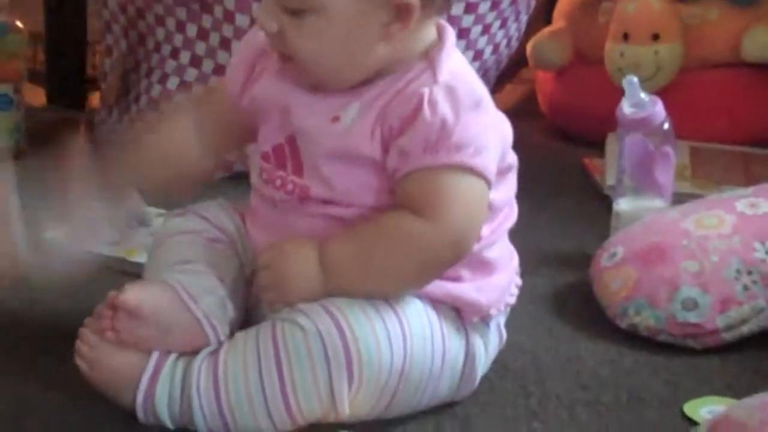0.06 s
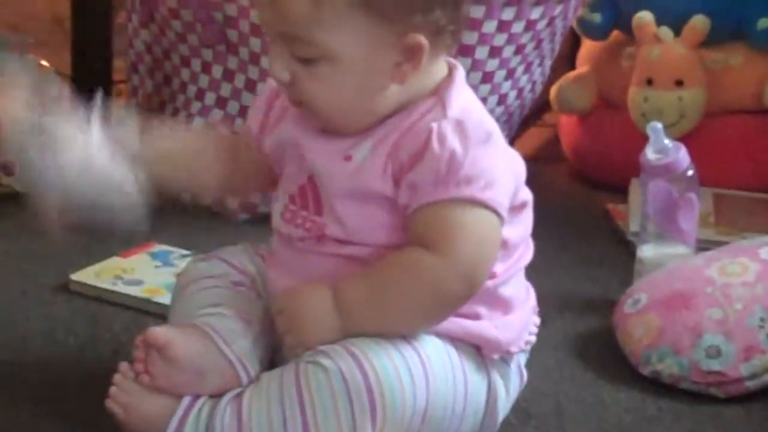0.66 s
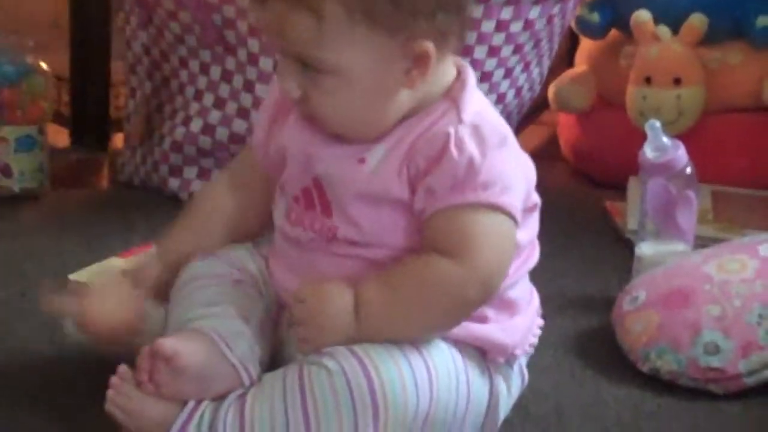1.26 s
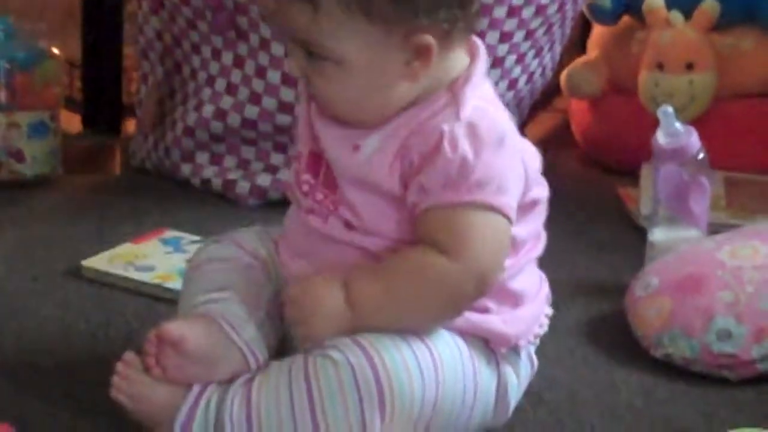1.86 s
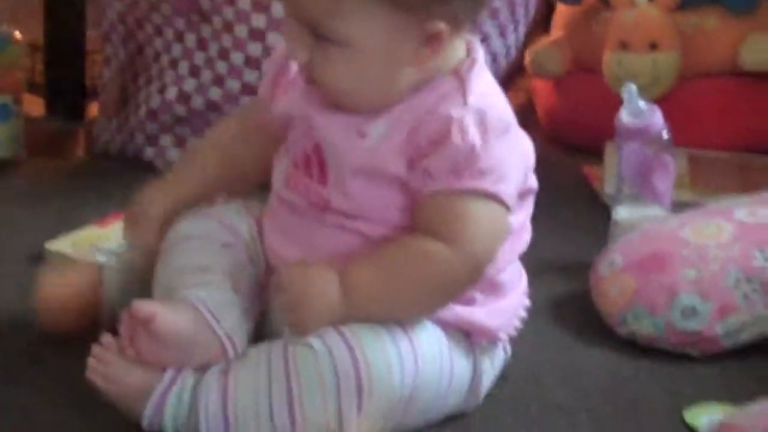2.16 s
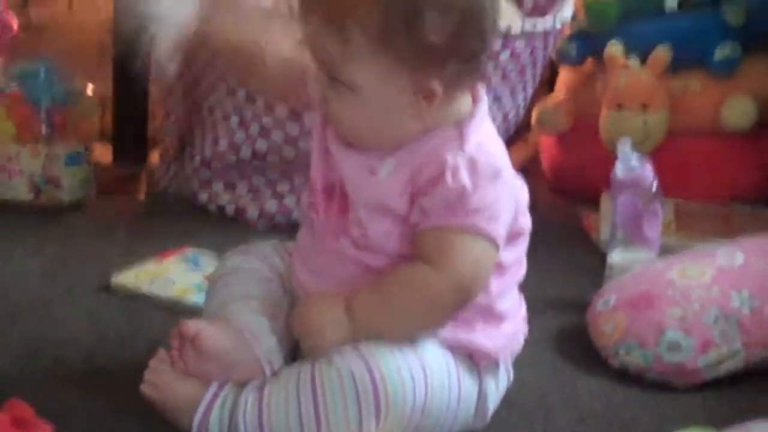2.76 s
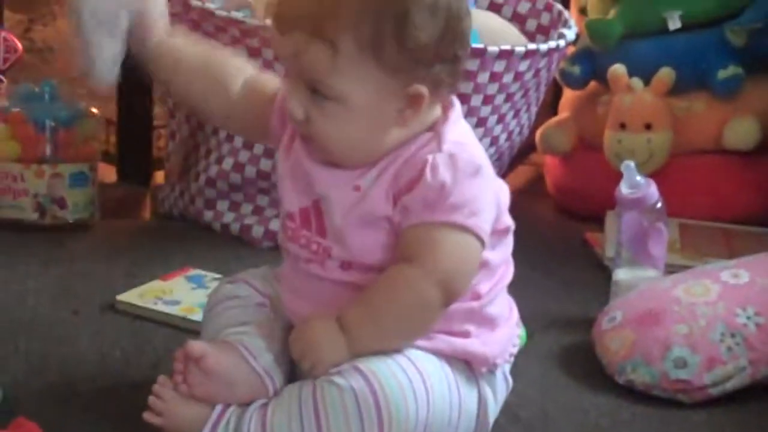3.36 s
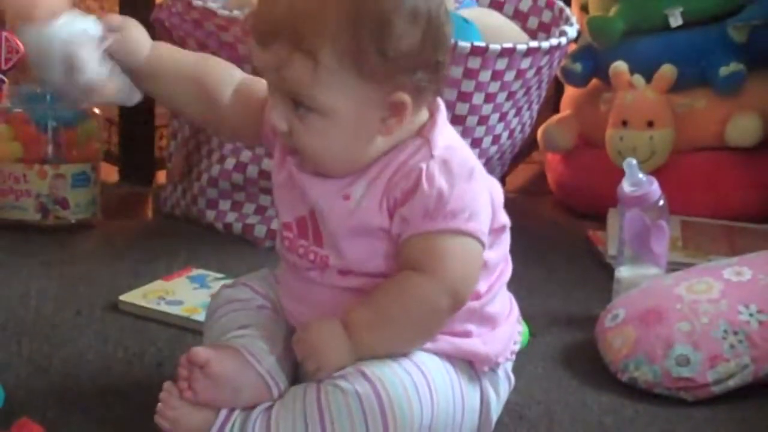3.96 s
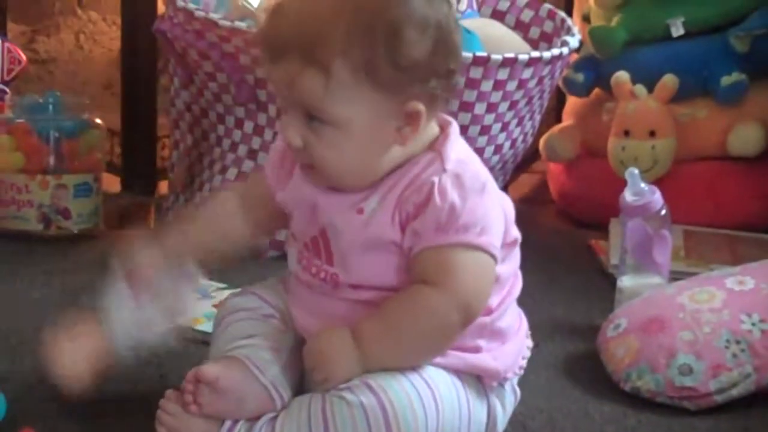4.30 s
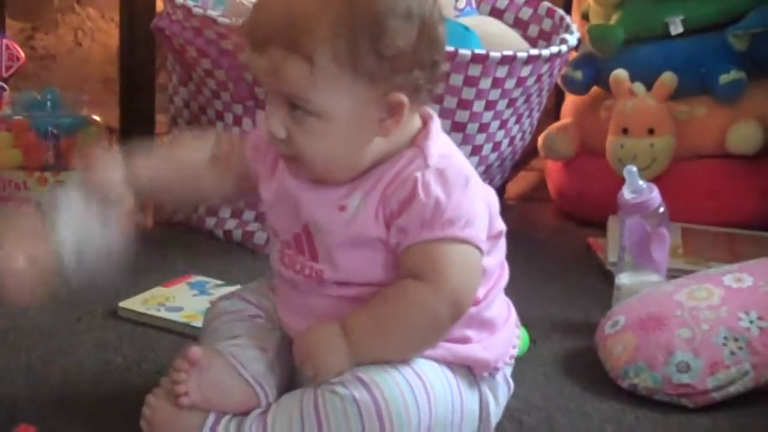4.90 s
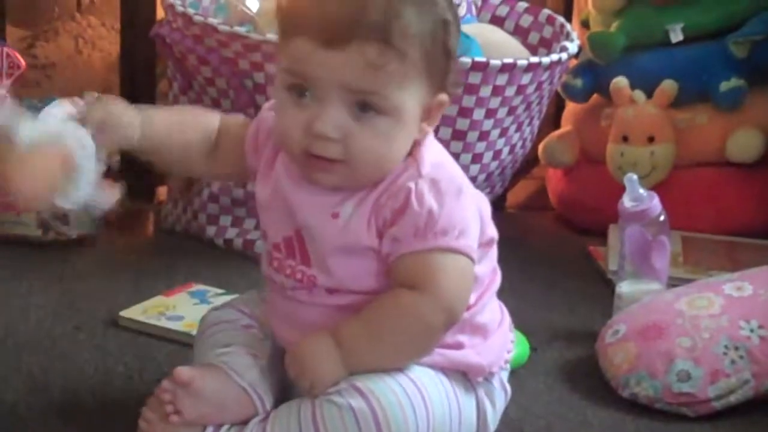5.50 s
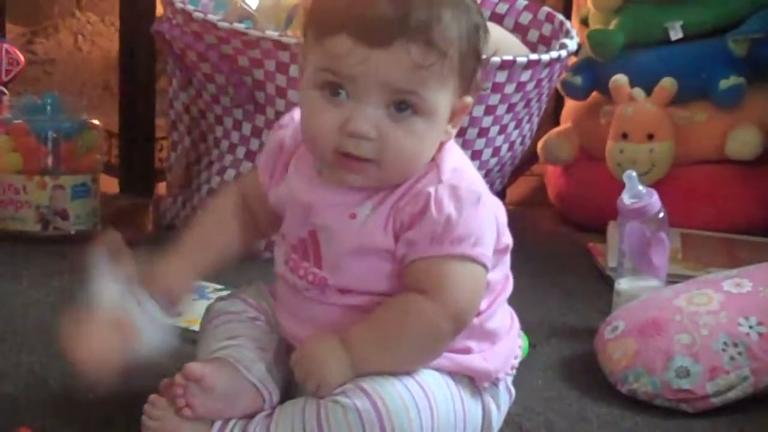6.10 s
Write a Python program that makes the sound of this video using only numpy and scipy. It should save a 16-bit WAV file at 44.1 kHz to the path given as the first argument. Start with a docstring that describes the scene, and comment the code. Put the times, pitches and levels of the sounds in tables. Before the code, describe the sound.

A doll's hard, hollow head is banged on a carpeted floor nine times at an uneven pace, quickening in the second half. Each blow is a short, dull knock with a crunch of carpet and a brief boom from the small living room. Soft flops, a few plastic clacks and a faint rustle of the doll's clothes come in between. The microphones add a light, steady hiss.

```python
"""In a small living room a baby bangs a doll's hard, hollow head on the carpeted floor nine times.
Each blow is a short dull knock with a crunch of carpet pile; nearby walls reflect it and the room's
standing waves boom briefly. Now and then the doll flops down again or clacks, and its clothes rustle
as it swings. A few faint, dry ticks sound close to the two small microphones, which add hiss and a
treble ring; a faint hum lies below."""
import sys
import numpy as np
from scipy import signal
from scipy.io import wavfile

SR = 44100
rng = np.random.default_rng(int(sys.argv[2]) if len(sys.argv) > 2 else 0)


def master_out(mix):
    """Clip the mix to full scale and print it as 16-bit PCM to the path in sys.argv[1]."""
    frames = np.transpose(np.atleast_2d(mix))
    ceiling = np.clip(frames, -1, 1)
    pcm = np.round(ceiling * 32767).astype(np.int16)
    wavfile.write(sys.argv[1], SR, pcm)


N = 270950

# landings of the head on the carpet:
# (time [s], strength [dB], boom [dB], shell resonance at the landing spot [Hz], its lift [dB])
BLOWS = [(0.1989, -2, -1, 1080, -8), (0.345, -26, 7.5, 750, 5.5), (1.279, -24, -12, 750, 13),
         (1.29, -2.5, -3.5, 1360, 6), (1.470, -27, 2.5, 920, 10), (2.1825, -3, 2, 790, 3),
         (3.0077, -3.5, -2.5, 617, -11), (3.6491, -1.5, 0.5, 1480, -5), (3.7481, -21.5, -4, 790, -17),
         (4.2976, -1, 0.5, 1750, 2), (4.824, 4.5, -7.5, 480, 0), (4.978, -28.5, 9.5, 393, 15.5),
         (5.2641, 0, -4, 730, 5), (5.8007, -2, -3, 1450, 3.5)]
RING = SR * 2 // 5  # samples in which one impact dies away
AGE = np.arange(RING) / SR  # seconds since an impact
TOP_HZ = 13900  # upper edge of hiss and crunch


def from_db(db):
    """Amplitude ratio: tenfold for every 20 dB."""
    return 10 ** (np.asarray(db) / 20)


def fade(t60):
    """Exponential decay by 60 dB in t60 seconds."""
    return np.exp(-np.log(1000) * AGE / t60)


def cut(x, hz, kind="low", order=2):
    """Butterworth filter: a maximally flat passband."""
    sections = signal.butter(order, np.minimum(hz, SR / 2 - 1), kind, fs=SR, output="sos")
    return signal.sosfilt(sections, x)


def resonate(x, hz, width_hz):
    """Second-order resonance with unit gain at its peak."""
    radius = np.exp(-np.pi * width_hz / SR)
    feedback = [1, -2 * radius * np.cos(2 * np.pi * hz / SR), radius ** 2]
    return signal.lfilter(np.array([1, 0, -1]) * (1 - radius ** 2) / 2, feedback, x + 1e-18)


def add(track, start_s, sound):
    """Superposition: a sound sums into the track from start_s on."""
    start = max(round(start_s * SR), 0)
    part = sound[..., :track.shape[-1] - start]
    track[..., start:start + part.shape[-1]] += part


def pan(sound, db):
    """Level difference as a cue to direction: left exceeds right by db."""
    return sound * from_db([[db / 2], [-db / 2]])


def modes(table, sign=1, spread_db=0):
    """Free vibration: damped modes, unevenly excited; a negative sign starts neighbours in antiphase."""
    return sum(sign ** k * from_db(db + spread_db * rng.standard_normal())
               * fade(t60) * np.cos(2 * np.pi * hz * AGE)
               for k, (hz, db, t60) in enumerate(table))


def burst(t60):
    """Many tiny random contacts sum to decaying noise, here of unit energy."""
    spray = rng.standard_normal(RING) * fade(t60)
    return spray / np.linalg.norm(spray)


def noise_bands(table, size):
    """Partially coherent stereo noise: yields each half-octave band with the table's extra columns."""
    hz, *columns = np.transpose(table)
    edges_hz = np.geomspace(20, 18000, 21)
    run_in = SR // 10  # samples for the filters to settle
    white = rng.standard_normal((2, 2, size + run_in))
    for k, (low, high) in enumerate(zip(edges_hz, edges_hz[1:])):
        log_centre = np.log(low * high) / 2
        db, *extras, coherence = [np.interp(log_centre, np.log(hz), column) for column in columns]
        mid, side = cut(white[k % 2], [low, high], "band")[:, run_in:]
        in_phase = np.sqrt((1 + coherence) / 2) * mid
        antiphase = np.sqrt((1 - coherence) / 2) * side * [[1], [-1]]
        yield from_db(db) * (in_phase + antiphase), extras


def background(hiss_db=-59):
    """Stationary noise floor: broadband microphone hiss and a faint tonal hum."""
    # hiss spectrum: (frequency [Hz], relative spectral density [dB], left-right coherence [0-1])
    spectrum = [(25, 11, 0.31), (60, 5.5, 0.18), (122, 3, 0.63), (252, 3, 0.76), (500, 1, 0.55),
                (950, 0.5, 0.52), (2070, -2.5, 0.21), (3100, 0.5, 0.47), (4020, -7, 0), (5560, -10.5, 0.11),
                (8640, -15.5, 0.12), (11900, -16, 0), (14000, -14, 0.1)]
    # steady hum tones: (frequency [Hz], rms level [dB])
    tones = [(120, -77.5), (1410, -77.5)]
    t = np.arange(N) / SR
    hiss = cut(sum(band for band, _ in noise_bands(spectrum, N)), TOP_HZ, order=24)
    hum = sum(from_db(db) * np.sqrt(2) * np.sin(2 * np.pi * hz * t) for hz, db in tones)
    return from_db(hiss_db) * hiss / hiss.std() + hum


def rustle(gain_db=-66.5, lead_s=0.025, half_length_s=0.25, band_hz=(4000, 9000)):
    """Friction noise: the clothes rustle around each full swing, louder on a harder one."""
    t = np.arange(N) / SR
    speed = sum(from_db(db) * np.exp(-((t - time_s + lead_s) / half_length_s) ** 2)
                for time_s, db, *_ in BLOWS if db > -10)  # weaker landings are flops, with no swing
    return from_db(gain_db) * speed * cut(rng.standard_normal((2, N)), band_hz, "band")


def tick(hz, width_hz, t60):
    """Resonant filtering: a faint, dry tick in one band, close to the microphones."""
    return resonate(resonate(burst(t60), hz, width_hz), hz, width_hz)


def clack(hz=5900, width_hz=3600, top_hz=10500):
    """Impulse response: hard plastic strikes with no cushion and gives one snap, mostly heard direct."""
    snap = resonate(signal.unit_impulse(RING), hz, width_hz)
    return room(cut(snap, top_hz), wet=0.098)


def room(sound, wet=1, wall_cut_hz=3500, build_s=0.0038, tail_db=-30):
    """Reverberation: direct sound, dull early reflections, then a diffuse tail unique to each landing."""
    # first reflections off furniture, walls and ceiling: (delay [s], level [dB])
    echoes = [(.0027, -6), (.0081, -3.5), (.0116, -4), (.0153, -4), (.021, -11), (.0236, -13), (.027, -11),
              (.0332, -9)]
    # diffuse field: (frequency [Hz], relative level [dB], t60 [s], left-right coherence [0-1])
    diffuse_field = [(62, 12, 0.35, 0), (254, -15, 0.39, 0.62), (484, 5.5, 0.22, 0.98),
                     (1080, 6.5, 0.28, 0.84), (2020, 13.5, 0.22, 0.68), (4120, 24, 0.23, 0.79),
                     (8500, 2.5, 0.44, 0), (15000, -32.5, .18, 0)]
    early = np.zeros(RING)
    for delay_s, db in echoes:
        add(early, delay_s, from_db([db]))
    tail = sum(band * fade(t60) for band, (t60,) in noise_bands(diffuse_field, RING))
    build_up = 1 - np.exp(-(AGE / build_s) ** 2)
    reflections = cut(early, wall_cut_hz, order=1) + from_db(tail_db) * tail * build_up
    return sound + wet * signal.fftconvolve(sound[None], reflections, axes=1)[:, :RING]


def knock(contact_hz, boom_db, spot_hz, spot_db, standing_db=-1, floor_lag_s=0.00201, boom_hz=260):
    """Modal excitation: head and room ring at the impact; the cushioning carpet takes off the treble."""
    # modes of the hollow head, damped by the carpet: (frequency [Hz], level [dB], t60 [s])
    head_modes = [(408.6, -15, 0.021), (556, -18, 0.0094), (1230, -40, 0.014)]
    # standing waves of floor and room: (frequency [Hz], level [dB], t60 [s])
    room_modes = [(67, -43, 0.13), (85.5, -31.5, 0.31), (115.5, -26.5, 0.36), (126.2, -25.5, 0.25),
                  (146.9, -22.5, 0.19), (184, -29.5, 0.26), (211.6, -24.5, 0.22), (254, -23, 0.18),
                  (289, -42.5, 0.6), (336, -23, 0.24), (378, -31.5, 0.35), (403.5, -22, 0.22),
                  (411.5, -36.5, 0.35), (469, -30.5, 0.29), (483.4, -31, 0.26), (525.4, -21.5, 0.22),
                  (570.6, -19, 0.19), (600, -22, 0.073), (700, -62, 0.43), (733, -24, 0.12),
                  (747, -31, 0.41), (865, -21.5, 0.08), (997, -24.5, 0.22), (1183, -56, 0.31)]
    sound = room(-modes(head_modes, spread_db=1.0))
    # the weight of the arm behind a blow feeds the lowest waves
    waves = [(hz, db + boom_db / (1 + (hz / boom_hz) ** 4), t60) for hz, db, t60 in room_modes]
    add(sound, floor_lag_s, from_db(standing_db) * modes(waves, sign=-0.951, spread_db=2.1))
    shell = resonate(sound, spot_hz, width_hz=0.43 * spot_hz)
    return cut(sound + (from_db(spot_db) - 1) * shell, contact_hz)


def crunch(t60=0.084, low_hz=1900, soft_hz=8300, grain_db=4, wash_db=4, wash_t60=0.22, build_s=0.0058):
    """Granular noise: pile and clothes crush in uneven grains, which the room smears into a wash."""
    grains = burst(t60) * from_db(grain_db * rng.standard_normal(RING))
    build_up = 1 - np.exp(-(AGE / build_s) ** 2)
    wash = np.array([burst(wash_t60), burst(wash_t60)]) * build_up
    sound = grains / np.linalg.norm(grains) + from_db(wash_db) * wash
    treble = cut(sound, low_hz, "high", order=1)
    return cut(cut(treble, soft_hz), TOP_HZ, order=12)


def blow(db, boom_db, spot_hz, spot_db):
    """Nonlinear contact: a harder landing squashes the pile further, so its knock is brighter."""
    contact_hz = 855 * from_db(0.22 * db)
    crunch_db = -13 + 0.64 * db  # the crunch grows more slowly than the knock
    thud = from_db(db) * knock(contact_hz, boom_db, spot_hz, spot_db)
    return pan(thud, db=-3.35) + from_db(crunch_db) * crunch()


def scene():
    """Superposition: the noise floor, a few close ticks, and the doll's rustle, clacks and blows."""
    # sharp plastic clacks: (time [s], strength [dB])
    clacks = [(0.1972, -14.5), (1.298, -11.5), (4.8227, 1), (4.902, -25)]
    # faint, dry ticks: (time [s], strength [dB], centre [Hz], bandwidth [Hz], t60 [s])
    ticks = [(0.018, -30.5, 4500, 6000, 0.035), (1.231, -10.5, 1100, 1710, 0.0098),
             (1.733, -6.5, 780, 300, 0.11), (1.788, -14.5, 1300, 1400, 0.028),
             (2.484, -22, 4570, 900, 0.035)]
    out = background() + rustle()
    for time_s, *landing in BLOWS:
        add(out, time_s, blow(*landing))
    snap = pan(clack(), db=5)
    for time_s, db in clacks:
        add(out, time_s, from_db(db) * snap)
    for time_s, db, hz, width_hz, t60 in ticks:
        add(out, time_s, from_db(db) * tick(hz, width_hz, t60))
    return out


def record(dry, low_cut_hz=45, high_cut_hz=16100):
    """Port resonance: each microphone rings at its own treble pitch; rumble and the very top are cut."""
    # left and right ports: (resonance [Hz], bandwidth [Hz], ring gain [dB], sensitivity [dB])
    ports = [(7740, 960, 12, 2.5), (6440, 1040, 12.5, 0.5)]
    heard = [from_db(db) * (channel + from_db(ring_db) * resonate(channel, hz, width_hz))
             for channel, (hz, width_hz, ring_db, db) in zip(dry, ports)]
    return cut(cut(np.array(heard), low_cut_hz, "high"), high_cut_hz, order=24)


dry = scene()
out = record(dry)
master_out(out)
```